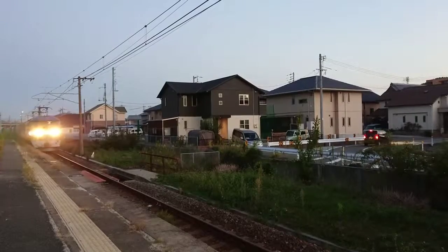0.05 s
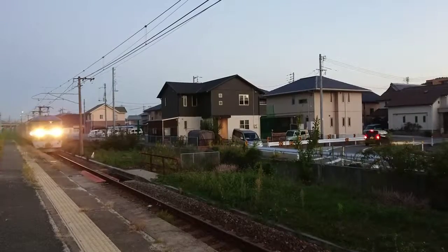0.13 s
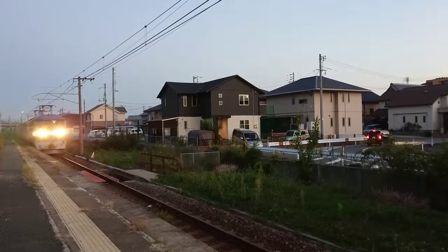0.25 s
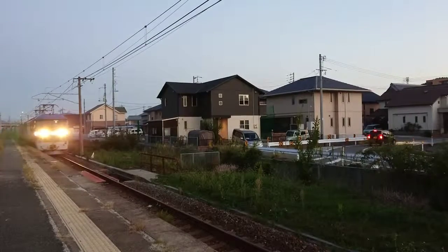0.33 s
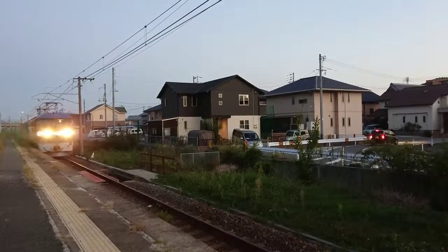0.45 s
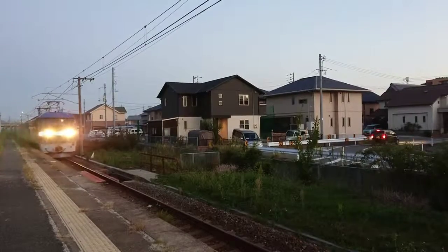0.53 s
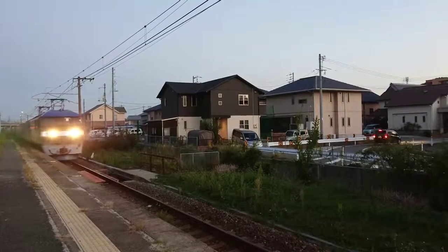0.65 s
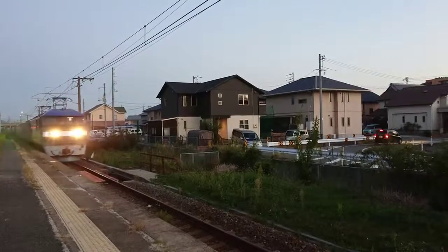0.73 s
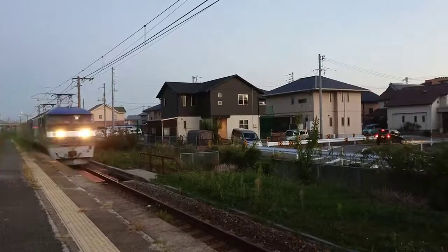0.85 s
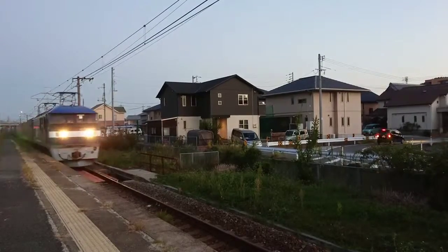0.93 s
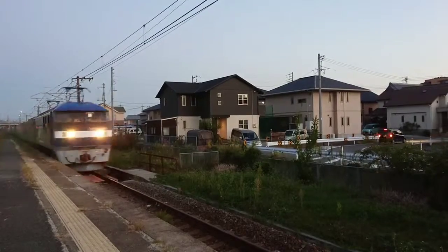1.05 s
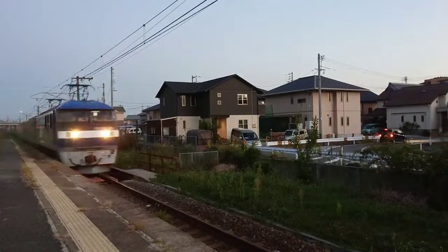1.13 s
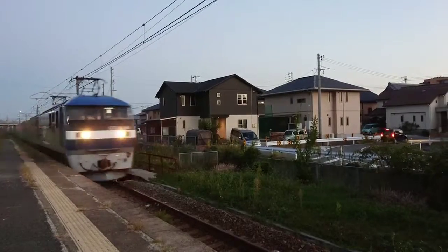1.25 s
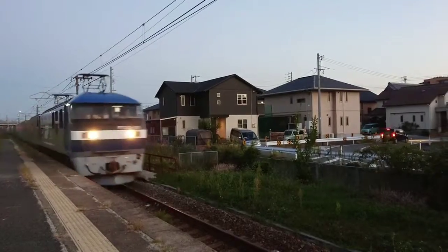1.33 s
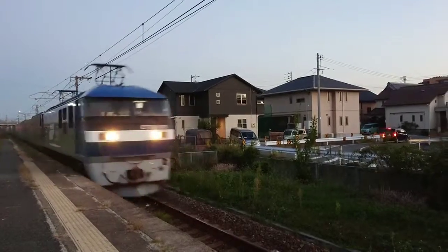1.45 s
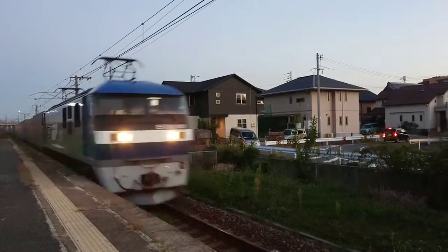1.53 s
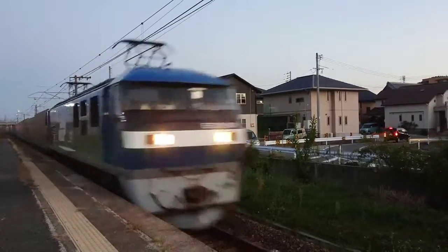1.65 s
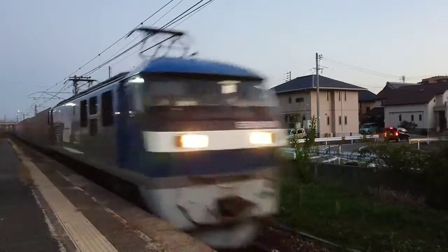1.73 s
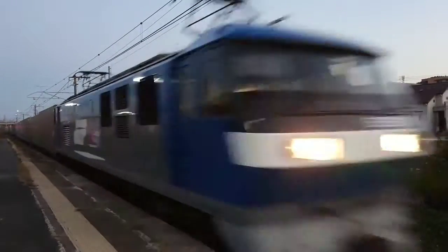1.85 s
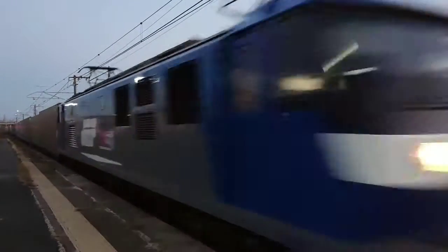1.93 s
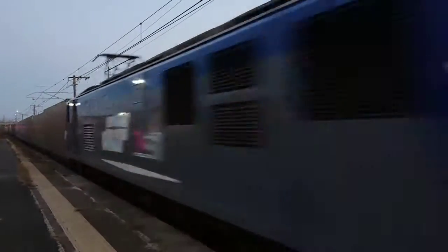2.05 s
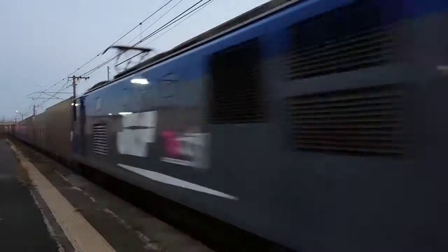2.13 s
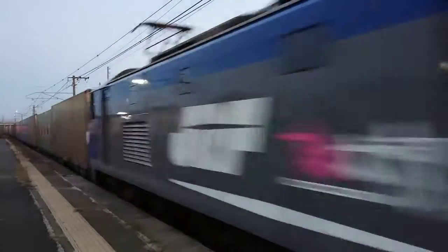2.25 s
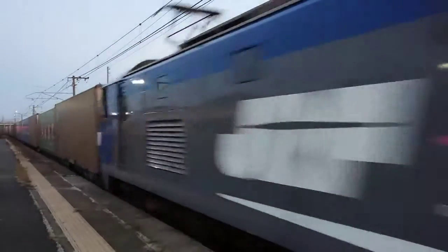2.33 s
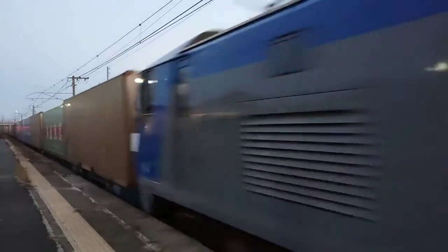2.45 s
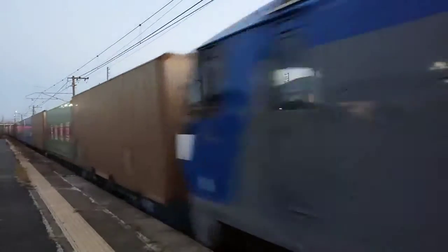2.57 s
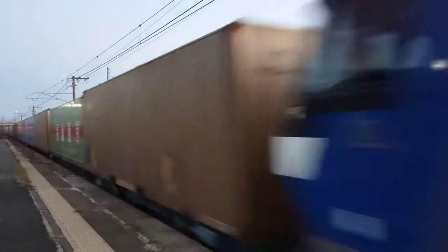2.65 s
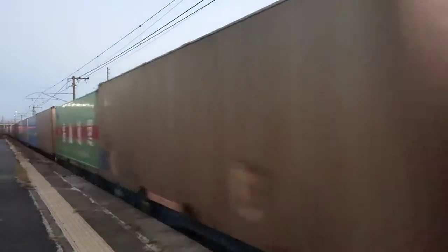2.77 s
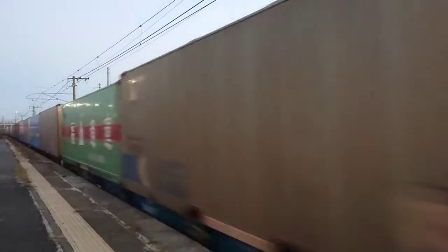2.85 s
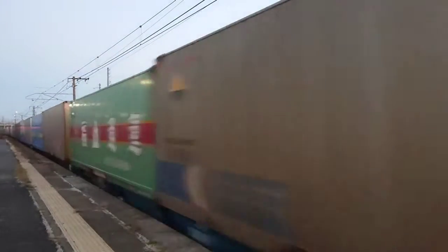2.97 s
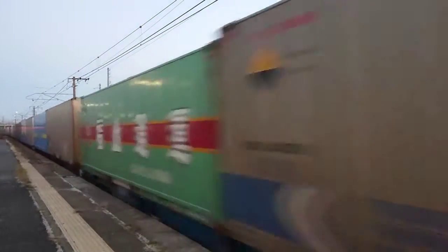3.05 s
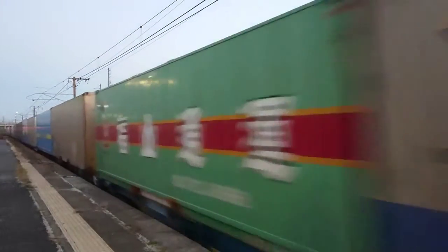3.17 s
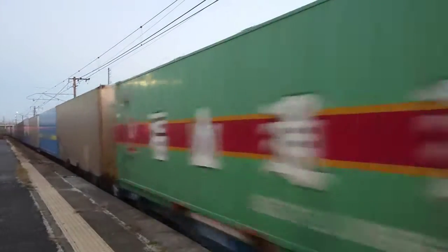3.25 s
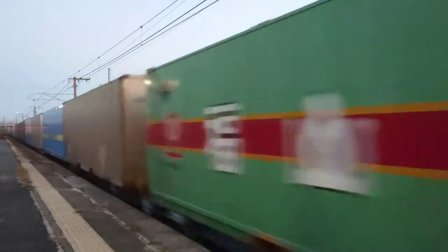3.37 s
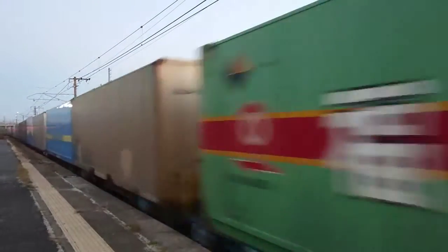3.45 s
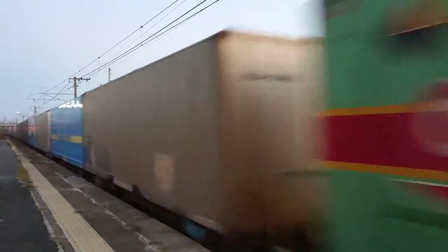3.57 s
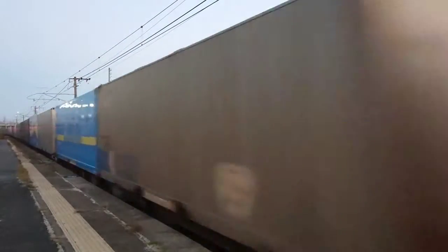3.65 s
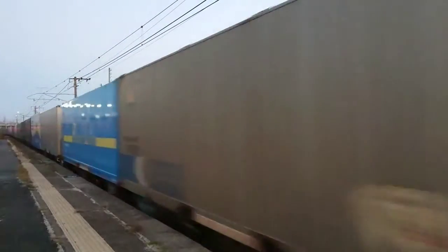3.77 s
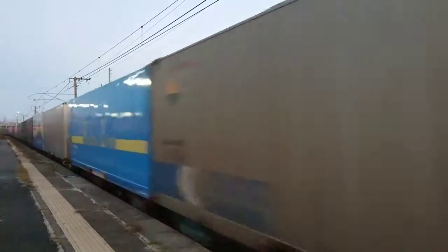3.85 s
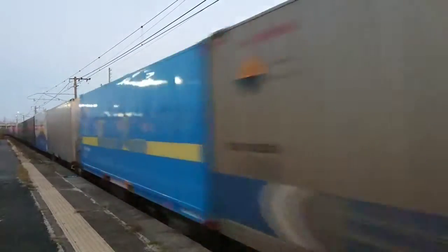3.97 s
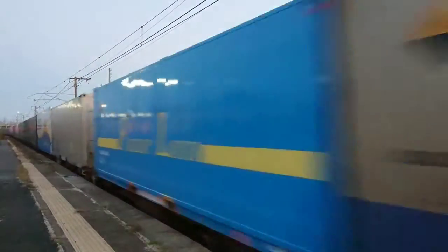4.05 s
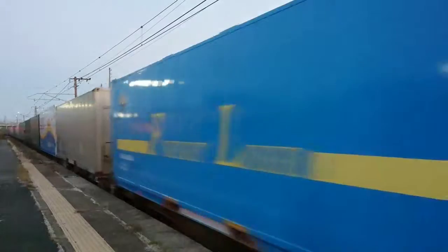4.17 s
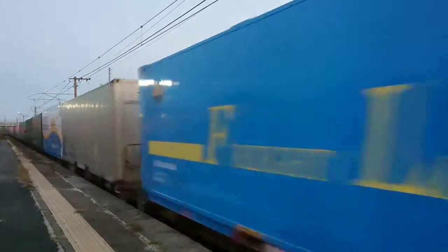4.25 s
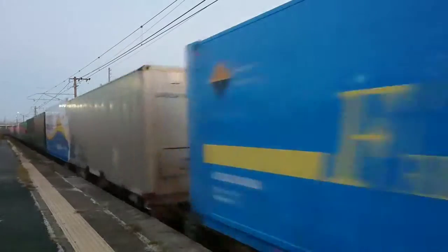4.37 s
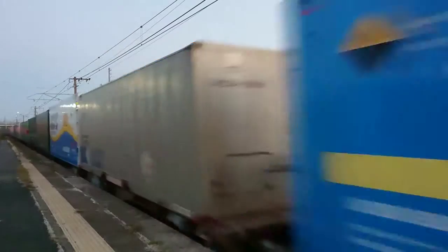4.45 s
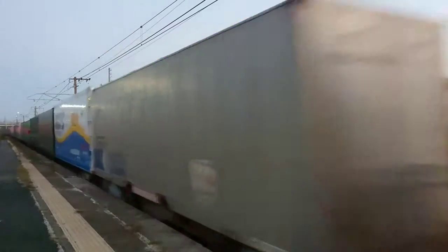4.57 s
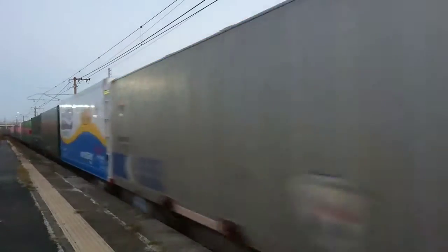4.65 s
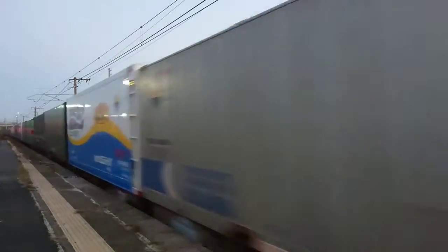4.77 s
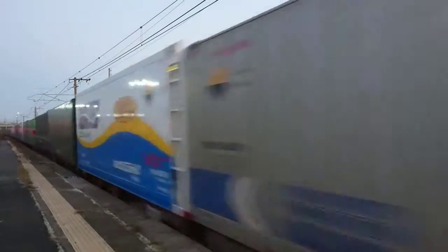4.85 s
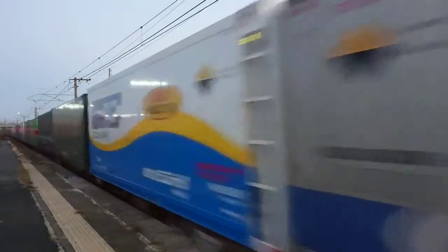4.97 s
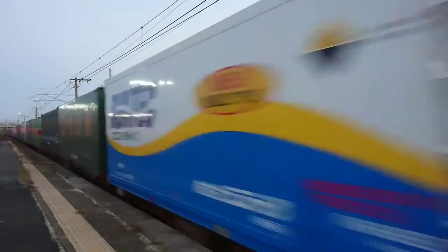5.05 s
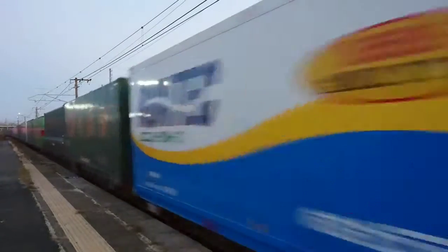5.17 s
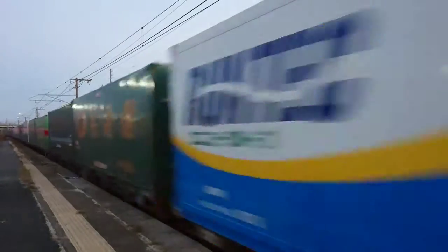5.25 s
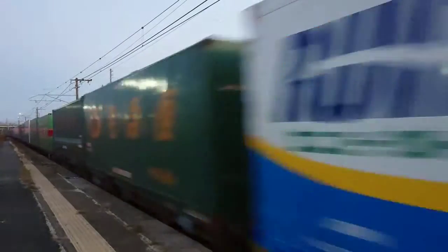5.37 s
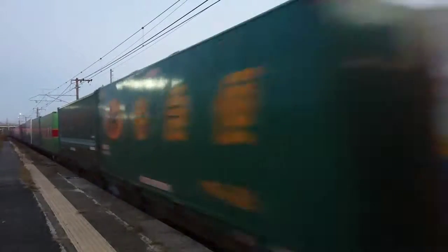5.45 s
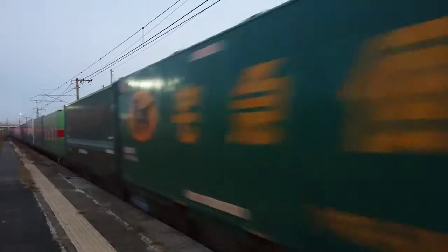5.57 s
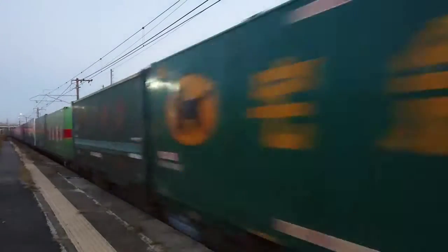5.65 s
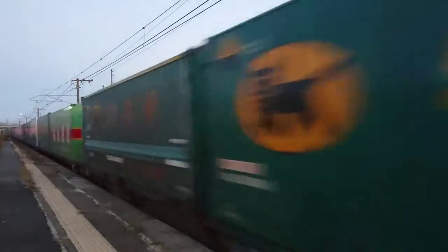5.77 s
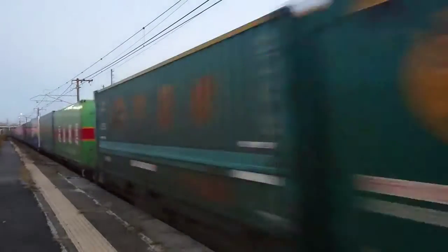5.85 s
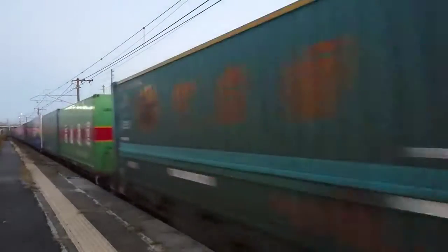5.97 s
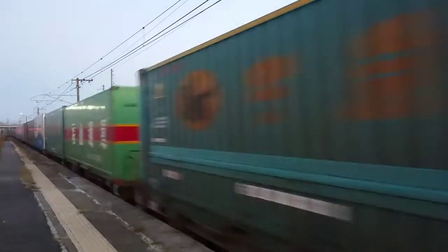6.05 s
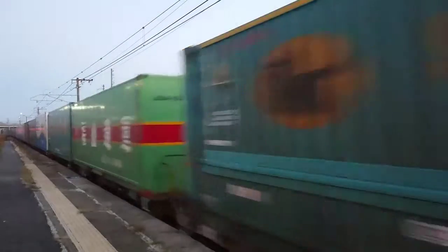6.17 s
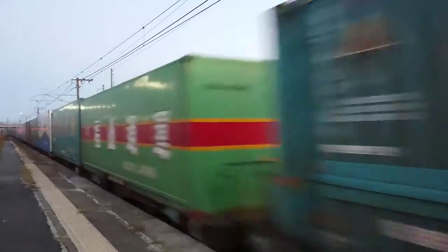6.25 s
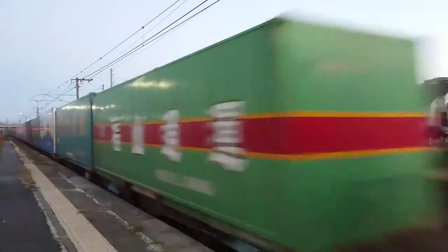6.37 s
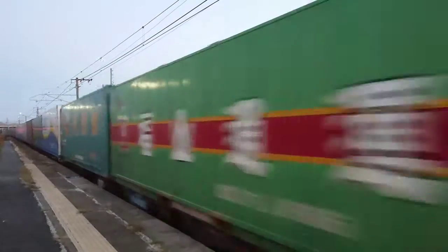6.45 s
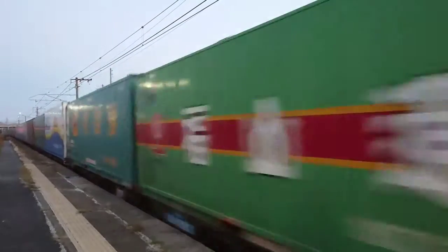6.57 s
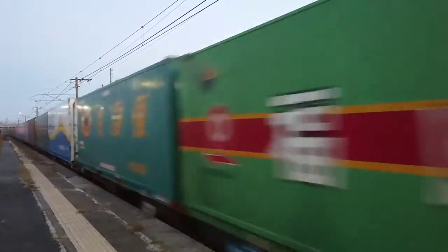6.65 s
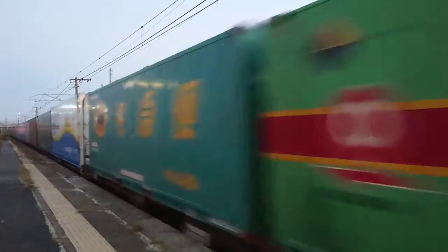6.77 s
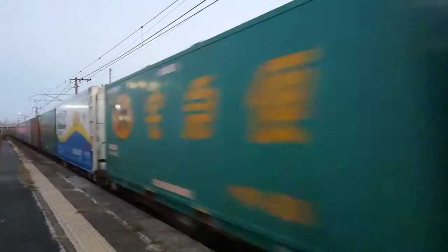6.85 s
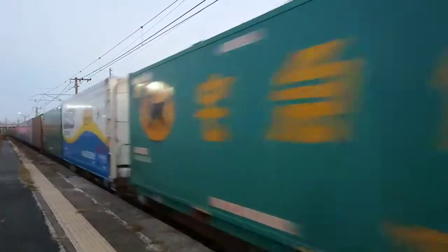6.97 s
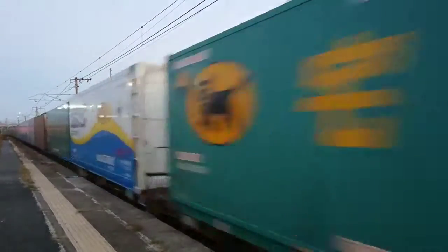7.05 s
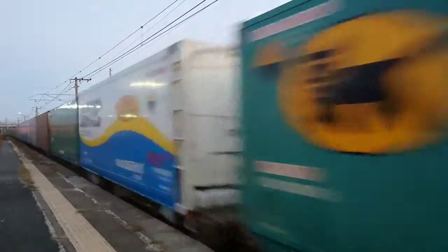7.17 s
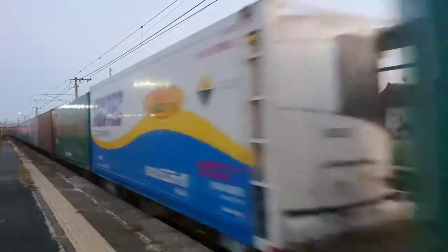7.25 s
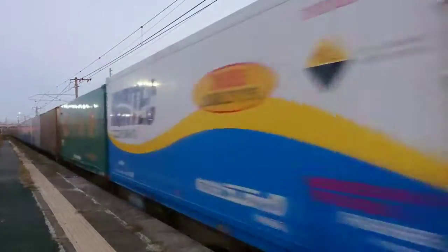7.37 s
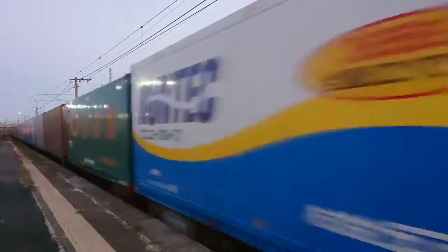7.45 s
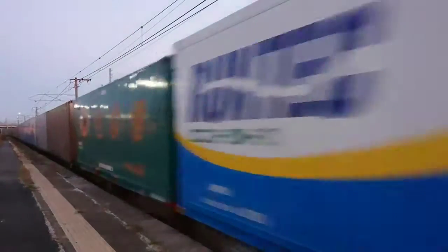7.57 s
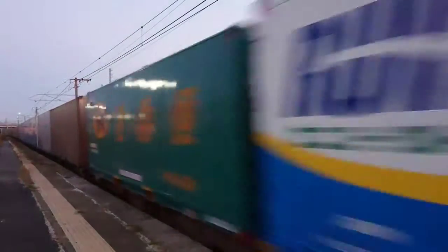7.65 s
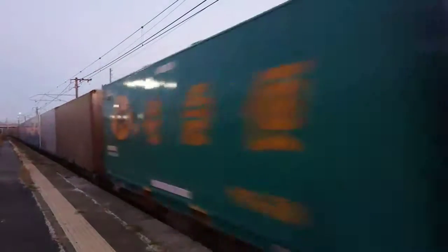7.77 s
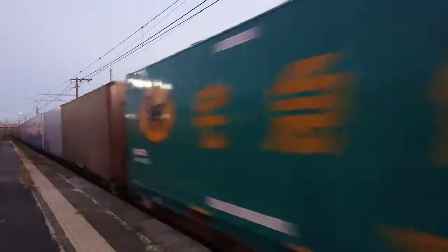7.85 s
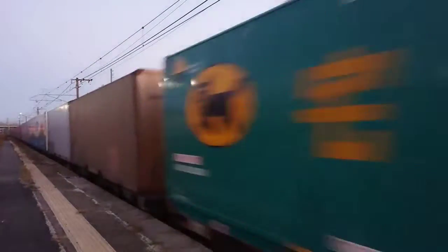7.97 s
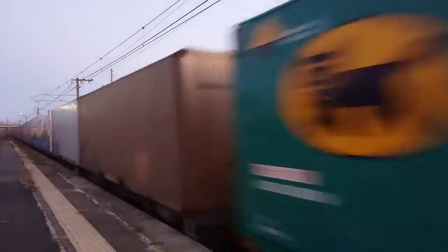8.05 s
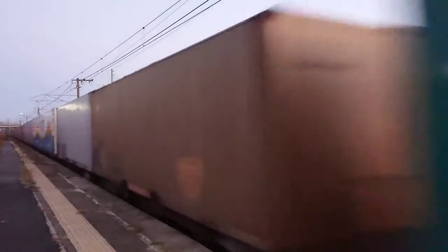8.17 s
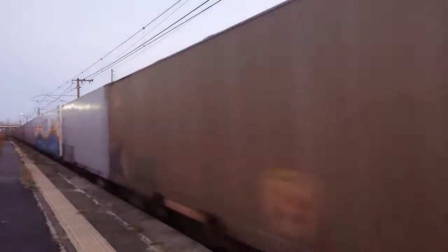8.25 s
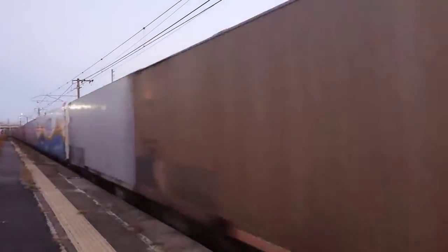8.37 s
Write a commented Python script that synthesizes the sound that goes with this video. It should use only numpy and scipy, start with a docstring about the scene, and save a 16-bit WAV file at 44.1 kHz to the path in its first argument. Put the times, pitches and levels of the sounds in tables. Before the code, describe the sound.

Close beside an outdoor station platform, singing rails and a faint hum announce an electric locomotive. Its blower roar swells quickly, with brief flange squeals and a gear whine dropping in pitch as it passes. Container wagons follow in regular surges of rolling noise and metallic wheel ringing. A flat wheel bangs rapidly past, and wind buffets the stereo microphones. The train is still passing at the end.

```python
"""Freight train passing a platform

An electric locomotive passes close by at about 74 km/h: blower noise, motor lines and Doppler-shifted gear tones.
Container wagons follow: rolling noise swells with each pair of bogies, and single wheels ring in one mode each.
A flat wheel strikes modes of its bogie frame and the sleepers.
Flanges squeal in narrow bands and air hisses in one broad, very high band.
The draught buffets the microphones as bursts of low noise, and one dry tick sounds close to the right one."""
import sys
import numpy as np
from scipy import signal
from scipy.fft import rfft, irfft, next_fast_len
from scipy.io import wavfile
from scipy.ndimage import map_coordinates

SR = 44100
rng = np.random.default_rng(int(sys.argv[2]) if len(sys.argv) > 2 else 0)


def waveform_to_disk(signal):
    """Save audio, clipped to [-1, 1], as 16-bit WAV at the path in sys.argv[1]."""
    frames = np.transpose(np.atleast_2d(signal))
    scaled = np.clip(frames, -1, 1) * 32767
    samples = np.round(scaled).astype(np.int16)
    wavfile.write(sys.argv[1], SR, samples)


N = 370881
T = np.arange(N) / SR
SIZE = next_fast_len(N, real=True)
HZ = np.maximum(np.arange(SIZE // 2 + 1) * SR / SIZE, 1)   # frequencies of the spectrum
SPEED_M_S, SOUND_M_S = 20.5, 343


def from_db(db):
    """Amplitude gain is ten to the power of a twentieth of the level in decibels."""
    return 10 ** (np.asarray(db) / 20)


def rms_one(x):
    """Normalisation: divide by the root of the mean power."""
    return x / np.sqrt(np.mean(x ** 2) + 1e-20)


def in_time(rows):
    """Linear interpolation of each column of a curve at every sample."""
    s, *columns = np.transpose(rows)
    return [np.interp(T, s, c) for c in columns]


def over_hz(points, axis=1):
    """Linear interpolation of one column along a log-frequency axis."""
    points = np.array(points)
    return np.interp(np.log(HZ), np.log(points[:, 0]), points[:, axis])


def drift(rate_hz):
    """Random modulation: white noise through two equal low-pass poles at `rate_hz`; rms about 1."""
    r = np.exp(-80 * np.pi * rate_hz / SR)   # made at a fortieth of the sample rate
    slow = signal.lfilter([1], [1, -2 * r, r * r], rng.standard_normal(N // 40 + 2002))[2000:]
    return np.interp(np.arange(N) / 40, np.arange(len(slow)), rms_one(slow))


# Coherence of the two sides: pitch_hz, likeness (0-1)
LIKENESS = [(60, 0.92), (130, 0.95), (300, 0.94), (640, 0.9), (1400, 0.28), (3000, 0.02), (6000, 0)]


def noise(spectrum):
    """Shaped stereo noise: mid and side mix to coherence in the bass, with steep outer skirts; rms 1."""
    skirts = np.minimum(1, np.minimum(HZ / spectrum[0][0], spectrum[-1][0] / HZ)) ** 6
    mid, side = rfft(rng.standard_normal((2, SIZE))) * from_db(over_hz(spectrum)) * skirts
    alike = np.clip(over_hz(LIKENESS), 0, 1)
    both = np.sqrt(1 + alike) * mid + np.sqrt(1 - alike) * side * [[1], [-1]]
    return rms_one(irfft(both, SIZE)[:, :N])


def tone(hz, waver_hz):
    """Frequency and amplitude modulation by chance broaden a sine into a line; rms 1."""
    phase = 2 * np.pi * np.cumsum(hz + waver_hz * drift(30)) / SR
    return rms_one(np.sin(phase) * from_db(2.2 * drift(18)))


def rough_tone(hz, width_hz):
    """Quadrature modulation by low-passed noise makes a narrow band around a moving pitch; rms 1."""
    phase = 2 * np.pi * np.cumsum(hz) / SR
    return rms_one(drift(width_hz) * np.sin(phase) + drift(width_hz) * np.cos(phase))


def resonances(modes):
    """Resonance: white noise filtered into peaks, each at its own level; rms 1."""
    power = sum(from_db(db) ** 2 / width_hz / (1 + ((HZ - hz) / width_hz) ** 2) ** 2
                for hz, db, width_hz in modes)
    return rms_one(irfft(rfft(rng.standard_normal(SIZE)) * np.sqrt(power), SIZE)[:N])


def ring(clicks, hz, t60):
    """Damped free vibration: a unit click sets a two-pole resonator ringing from height 1."""
    r, w = from_db(-60 / (t60 * SR)), 2 * np.pi * hz / SR
    return signal.lfilter([0, np.sin(w)], [1, -2 * r * np.cos(w), r * r], clicks + 1e-18)


def struck(times, levels_db, modes, contact_hz):
    """Modal excitation: blows softened by a low-pass at `contact_hz` ring modes of alternating sign."""
    blows = np.zeros(N)
    blows[(times * SR).astype(int)] = from_db(levels_db)
    blows = signal.sosfilt(signal.butter(1, contact_hz, fs=SR, output="sos"), blows + 1e-18)
    return sum(from_db(db) * ring(blows, hz, t60) * (-1) ** k for k, (hz, db, t60) in enumerate(modes))


def arch(start_s, length_s):
    """Envelope: the root of a half sine rises quickly, holds and falls quickly."""
    return np.sqrt(np.abs(np.sin(np.pi * np.clip((T - start_s) / length_s, 0, 1))))


def burst(s, rise_s, fall_s, hold_s=0):
    """Envelope: exponential growth to 1 at time s, a hold, then exponential decay."""
    before, after = np.maximum(s - T, 0), np.maximum(T - s - hold_s, 0)
    return np.exp(-np.minimum(before / rise_s + after / fall_s, 20))


def lumps(rows):
    """Envelope: a sum of Gaussian swells, each with its centre, spread and level."""
    return sum(from_db(db) * np.exp(-.5 * np.minimum(((T - s) / spread_s) ** 2, 60)) for s, spread_s, db in rows)


def nearness(t, abreast_s, reach_m, falloff):
    """Distance law: gain 1 when abreast, falling as distance to the power `falloff` beyond the reach."""
    return np.hypot(1, SPEED_M_S * (t - abreast_s) / reach_m) ** -falloff


def doppler(t, abreast_s, distance_m):
    """Doppler effect: the pitch ratio is above 1 on approach and below 1 on departure."""
    past_m = SPEED_M_S * (t - abreast_s)
    return 1 / (1 + SPEED_M_S / SOUND_M_S * past_m / np.hypot(past_m, distance_m))


def passing(sound, abreast_s):
    """Doppler effect by propagation delay: changing travel time bends the pitch, with a slight wobble."""
    travel_s = np.hypot(SPEED_M_S * (T - abreast_s), 2.0) / SOUND_M_S + .0001 * drift(6)   # track 2 m away
    return np.interp(T - travel_s, T, sound)


def sweep(x, abreast_s, turn_s, far_lag_s, near_lag_s):
    """Time-difference localisation: the left side first leads, then lags, as the source moves rightward."""
    lag = np.interp(T, [abreast_s - turn_s, abreast_s + turn_s], [-far_lag_s, near_lag_s])
    return np.array([map_coordinates(x[0], [(T - lag) * SR], order=3, mode="nearest"), x[1]])


# Rail joints ahead: crossed_s, track_loss_db, rail_loss_db (losses until crossed)
JOINTS = [(.55, 1, 4.5), (1.33, 6, 3.2)]
CROSSING_S = 0.072


def past_joints(axis):
    """Transmission loss: track (column 1) or rail (column 2) sound rises as each joint is crossed."""
    return from_db(-sum(joint[axis] * np.clip(.5 - (T - joint[0]) / CROSSING_S, 0, 1) for joint in JOINTS))


# Rail noise spectrum: pitch_hz, density_db (per Hz, relative)
RAILS = [(1400, -30), (1900, -25), (2230, 5), (2450, -1.5), (2800, -1), (3300, -14), (4400, 1.5),
         (5200, -1), (6500, -17.5), (12000, -23), (15500, -30)]
ARRIVAL_S = 2.4
RAIL_DB, RAIL_RISE_DB_PER_M = -36, 0.03   # level on arrival, before flutter; slight rise with distance ahead


def rails():
    """Structure-borne sound: rails sing nearly steadily ahead, step up at joints, fade once covered."""
    ahead_m = SPEED_M_S * np.maximum(ARRIVAL_S - T, 0)
    uncovered = nearness(np.maximum(T, ARRIVAL_S), ARRIVAL_S, reach_m=25, falloff=1.6)
    level = from_db(RAIL_DB + RAIL_RISE_DB_PER_M * ahead_m + 0.2 * drift(13))
    return level * past_joints(axis=2) * uncovered * noise(RAILS)


# Wagon ends, a bogie either side of the coupling: abreast_s, track_level_db, wheel_level_db
# (levels per bogie, before the random wavering and the wheel gain)
WAGON_ENDS = [(2.9, -24, -29.5), (3.928, -24, -31.5), (4.85, -24, -31.5), (5.738, -23.5, -29.5),
              (6.658, -24.5, -30), (7.518, -23.5, -30), (8.39, -25, -30.5)]
BOGIE_GAP_M = 4.46   # between the two bogies at a coupling


def wagons(levels_db, reach_m, falloff):
    """Incoherent summation: the powers of all passing bogies add, two at each coupling."""
    half_s = .5 * BOGIE_GAP_M / SPEED_M_S
    return np.sqrt(sum((from_db(db) * nearness(T, end[0] + offset, reach_m, falloff)) ** 2
                       for end, db in zip(WAGON_ENDS, levels_db) for offset in (-half_s, half_s)))


# Radiation spectra of bodies, track and wheel discs: pitch_hz, density_db (per Hz, relative)
RUMBLE = [(13, -44), (22, -39), (43, -9.5), (64, -1), (119, -2.5), (194, -9), (220, -7.5), (290, -36),
          (480, -120)]
TRACK = [(100, -12), (170, -2), (195, -4.5), (276, 4.5), (323, -1.5), (422, -1.5), (658, -10), (920, -8.5),
         (1250, -13.5), (1480, -21), (1800, -26), (2340, -57), (3960, -120)]
WHEELS = [(1200, -33), (1800, -6), (2200, -2), (2600, 1.5), (3100, -4.5), (3500, -2), (3850, -4.5),
          (4400, 4), (4850, 3), (5300, 3), (6100, -5.5), (7200, -15), (12500, -21.5), (15500, -37)]
# Booms of the rocking wagon bodies: centre_s, spread_s, level_db
BOOMS = [(3.05, 0.081, -25), (3.45, 0.17, -23.5), (4.75, 0.073, -27), (5.3, 0.15, -21.5),
         (7.55, 0.097, -24)]
LOCO_S = 2.474   # the locomotive's middle is abreast
# closest-point levels, before the random wavering and the wheel gain
LOCO_RUMBLE_DB, LOCO_TRACK_DB, LOCO_WHEELS_DB, WAGON_RUMBLE_DB = -16.5, -18.5, -20.5, -31


def rolling():
    """Roughness excitation: treads and rails shake bodies, track and wheel discs, swelling with the bogies."""
    _, track_db, wheel_db = np.transpose(WAGON_ENDS)
    waver = drift(2.4)   # slow random wavering of the rolling level
    rumble = np.hypot(from_db(LOCO_RUMBLE_DB) * nearness(T, LOCO_S - .05, reach_m=6.7, falloff=1.53),
                      wagons([WAGON_RUMBLE_DB] * len(WAGON_ENDS), reach_m=15.8, falloff=1.32))
    track = np.hypot(from_db(LOCO_TRACK_DB) * nearness(T, LOCO_S, reach_m=2.7, falloff=0.88),
                     wagons(track_db, reach_m=3.42, falloff=0.88))
    wheels = np.hypot(from_db(LOCO_WHEELS_DB) * nearness(T, LOCO_S, reach_m=5.96, falloff=2.38),
                      wagons(wheel_db, reach_m=3.0, falloff=0.93))
    rumble = np.hypot(rumble, lumps(BOOMS))
    track = track * past_joints(axis=1) * from_db(1.43 * waver)
    wheels = wheels * past_joints(axis=2) * from_db(3.5 + 0.5 * waver + 1.0 * drift(12.6))
    return rumble * noise(RUMBLE) + track * noise(TRACK) + wheels * noise(WHEELS)


# Motor hums and blower whistles: pitch_hz, arrival_level_db, growth_db_per_s, waver_hz
MOTOR_LINES = [(364, -42, 3, 1.05), (1145, -48.5, 6.5, 13), (1334, -40, 6.5, 2.5)]
MOTOR_FADE_DB_PER_S = 47
# Deep hum of the far locomotive: start_s, length_s, level_db
HUMS = [(-.2, 0.97, -36.5), (1.603, 0.34, -30)]
HUM_HZ = 65.9


def motors():
    """Directivity: tones beamed forward grow until arrival, then fade; a deep hum comes and goes."""
    before_s, after_s = np.maximum(ARRIVAL_S - T, 0), np.maximum(T - ARRIVAL_S, 0)
    whistles = sum(from_db(db - growth * before_s - MOTOR_FADE_DB_PER_S * after_s) * tone(hz, waver_hz)
                   for hz, db, growth, waver_hz in MOTOR_LINES)
    hum = sum(from_db(db) * arch(s, length_s) for s, length_s, db in HUMS) * tone(HUM_HZ, waver_hz=1.7)
    return whistles + hum


# Blower noise spectrum: pitch_hz, density_db (per Hz, relative)
BLOWERS = [(150, -2.5), (330, 15), (480, -42), (620, 6), (800, 6), (980, 0), (1400, 0.5), (1800, -2),
           (2200, 5.5), (2650, -12), (3400, -7), (6500, -23.5), (11000, -17.5), (15500, -45)]
BLOWERS_S = 2.43   # the air outlets are abreast


def blowers():
    """Turbulent flow noise: cooling air roars with a fluctuating level that follows the distance law."""
    level = from_db(-16.5 + 1.06 * drift(29)) * nearness(T, BLOWERS_S, reach_m=3.46, falloff=1.147)
    return level * noise(BLOWERS)


# Overtones of the gear whine at rest: pitch_hz, level_db (relative), width_hz
GEAR = [(1068, 2, 24), (1612, -10, 9), (2140, -2, 20), (2690, -13, 25)]
# Gearboxes beaming their whine forward: abreast_s, lead_s (of the loudest moment), level_db
GEARBOXES = [(2.48, .08, -26), (3.0, .24, -26)]
# Meshing tones: abreast_s, multiple (of the tooth rate), loudest_s, reach_m, waver_hz, level_db
TOOTH_TONES = [(2.6, 4, 2.23, 1.6, 13, -30), (2.54, 2, 2.38, 1.6, 20, -26), (2.98, 4, 2.49, 2.0, 11, -28),
               (2.98, 4, 2.7, 2.2, 11, -24), (3.02, 2, 2.74, 4.0, 14, -27.5), (2.98, 1, 2.76, 1.7, 3, -25)]
TOOTH_HZ, GEAR_DISTANCE_M = 540, 2.4
# Drone near the tooth rate: time_s, level_db (relative to DRONE_DB)
DRONE_LEVEL = [(2.55, -60), (2.68, -12), (2.85, -9), (2.9, -1), (2.97, -4), (3.19, -1), (3.24, -15),
               (3.8, -21), (4.2, -70)]
DRONE_HZ, DRONE_DB, DRONE_WAVER_HZ, DRONE_ABREAST_S, DRONE_DISTANCE_M = 548, -23, 10, 2.8, 2.2


def gears():
    """Tooth meshing: whine, harmonics and a drone at the locomotive's tail, lowered by Doppler in passing."""
    whine = sum(from_db(db) * nearness(T, s - lead_s, reach_m=3.4, falloff=1.8) * passing(resonances(GEAR), s)
                for s, lead_s, db in GEARBOXES)
    teeth = 0
    for s, multiple, loudest_s, reach_m, waver_hz, db in TOOTH_TONES:
        hz = multiple * TOOTH_HZ * doppler(T, s, GEAR_DISTANCE_M)
        teeth = teeth + from_db(db) * nearness(T, loudest_s, reach_m, np.sqrt(2)) * tone(hz, waver_hz)
    drone_db, = in_time(DRONE_LEVEL)
    drone = tone(DRONE_HZ * doppler(T, DRONE_ABREAST_S, DRONE_DISTANCE_M), DRONE_WAVER_HZ)
    return whine + teeth + from_db(DRONE_DB + drone_db) * drone


# Hiss spectrum: pitch_hz, density_db (per Hz, relative)
HISS_COLOUR = [(7000, -30), (10000, 0), (13000, 6), (15500, -7)]
# Puffs of air from the wagons: start_s, level_db (before flutter), decay_s
PUFFS = [(2.85, -50, 0.27), (5.39, -40.5, 0.24), (5.72, -50, 0.1), (6.46, -50, 0.2), (8.28, -51, 0.2)]
PUFF_RISE_S, PUFF_HOLD_S = 0.049, 0.074
LOCO_HISS_DB = -44   # when abreast, before flutter


def hiss():
    """Jet noise: a thin, high hiss passes with the locomotive and comes in puffs from the wagons."""
    level = from_db(LOCO_HISS_DB) * nearness(T, LOCO_S, reach_m=2.3, falloff=1.05)
    level = level + sum(from_db(db) * burst(s, PUFF_RISE_S, decay_s, PUFF_HOLD_S) for s, db, decay_s in PUFFS)
    return level * from_db(2.7 * drift(8.1)) * noise(HISS_COLOUR)


# Flange squeals: start_s, length_s, pitch_hz (at the start), glide_hz, level_db
SQUEALS = [(1.52, 0.115, 780, 115, -27.5), (1.68, 0.6, 855, -32, -34), (2.22, 0.15, 828, -10, -26)]
SQUEAL_WIDTH_HZ = 13   # at 1 kHz; grows with the root of the pitch


def squeals():
    """Friction excitation: flanges rub the rail in short, rough glides."""
    out = np.zeros(N)
    for s, length_s, hz, glide_hz, db in SQUEALS:
        width_hz = SQUEAL_WIDTH_HZ * np.sqrt(hz / 1000)
        pitch_hz = hz + glide_hz * np.clip((T - s) / length_s, 0, 1)
        out += from_db(db) * arch(s, length_s) ** 2 * rough_tone(pitch_hz, width_hz)
    return out


# Buffets of the draught: centre_s, spread_s, level_db (before the left/right gains)
GUSTS = [(1.887, 0.013, -18), (2.32, 0.015, -12), (2.436, 0.047, -13), (4.25, 0.038, -16),
         (7.86, 0.019, -17), (8.37, 0.11, -17)]
# Buffet spectrum: pitch_hz, density_db (per Hz, relative)
GUST_COLOUR = [(25, -13), (48, 9.5), (110, 4), (250, -13), (600, -56)]


def draught():
    """Pressure fluctuation: lumps of moving air hit mostly the left microphone."""
    return lumps(GUSTS) * noise(GUST_COLOUR) * from_db([[-2], [-13]])


# Single wheels ringing as they go by: abreast_s, pitch_hz (at rest), level_db (before the left/right gains)
RINGING_WHEELS = [(3.66, 4580, -35.5), (3.87, 4320, -37), (4.02, 4480, -35), (4.13, 4130, -33),
                  (4.54, 4650, -34.5), (4.69, 4160, -37), (4.83, 2660, -38), (4.98, 3450, -35.5),
                  (4.98, 5500, -36.5), (5.01, 4520, -37.5), (5.98, 4280, -36), (6.38, 4440, -36),
                  (6.83, 5130, -31.5), (6.85, 2620, -37), (7.36, 2750, -36.5), (7.4, 5280, -32),
                  (7.42, 4440, -31), (7.48, 3530, -39), (8.32, 4420, -35)]
RING_WIDTH_HZ, RING_REACH_M, RING_DISTANCE_M, RING_BREAKUP_DB = 90, 1.5, 5.5, 2


def wheel_song():
    """Modal radiation: wheels ring roughly in one mode each, swelling and sinking in pitch by Doppler."""
    out = np.zeros(N)
    flutter = drift(RING_WIDTH_HZ) + 1j * drift(RING_WIDTH_HZ)
    flutter = flutter * rms_one(from_db(RING_BREAKUP_DB * drift(35)))
    for s, hz, db in RINGING_WHEELS:
        near = np.abs(T - s) < .5
        t, own_flutter = T[near], np.roll(flutter, rng.integers(N))[near]
        phase = 2 * np.pi * np.cumsum(hz * doppler(t, s, RING_DISTANCE_M)) / SR
        rough_ring = np.real(own_flutter * np.exp(1j * phase))
        out[near] += from_db(db) * nearness(t, s, RING_REACH_M, 2.35) * rough_ring
    return out * from_db([[-2], [2]])


# Blows of the flat wheel, one a turn: blow_s, frame_level_db, sleeper_level_db, shudder_level_db
FLATS = [(5.52, -30, -30, -27), (5.633, -15, -17, -18.5), (5.741, -.5, -12, -19), (5.853, -13, -12, -14.5),
         (5.961, -16, -3.5, -21.5), (6.073, -5, -28, -20.5), (6.192, -12, -15, -24),
         (6.311, -13, -22, -24.5), (6.432, -14, -30, -27)]
# Modes of the bogie frame, then of a sleeper in its ballast: pitch_hz, level_db (relative), t60_s
FRAME = [(384, -2, 0.064), (538, -3, 0.031), (644, -8, 0.028), (870, -14, 0.021), (1780, -16, 0.1)]
SLEEPER = [(231, 1, 0.071), (294, 2, 0.027)]
CONTACT_HZ, SLEEPER_CONTACT_HZ = 1500, 500   # softness of the blow; the ballast softens it further
# Spectra of the shuddering bogie frame and the struck wheel: pitch_hz, density_db (per Hz, relative)
SHUDDER = [(120, -15), (250, 4.5), (400, 2.5), (620, -3), (1000, -8.5), (1500, -29)]
CLANG = [(1000, 6.5), (1600, -1), (1880, 8.5), (2150, 1), (2500, 5.5), (3000, -6), (5000, 0), (8000, -24.5),
         (12500, -21), (15500, -37)]
CLANG_DB, CLANG_ABREAST_S, FLAT_REACH_M = -21, 5.79, 3.4   # clang level before the grain
# the flat spot scrapes into the rail just before each blow and chatters on after it
SCRAPE_LEAD_S, CHATTER_S, CHATTER_GRAIN_DB = .004, .023, 2.5


def flat_wheel():
    """Impact: each turn a flat spot knocks frame and sleeper modes; chatter shakes bogie and wheel."""
    times, frame_db, sleeper_db, shudder_db = np.transpose(FLATS)
    thud = struck(times, frame_db, FRAME, CONTACT_HZ) + struck(times, sleeper_db, SLEEPER, SLEEPER_CONTACT_HZ)
    shudder = sum(from_db(db) * burst(s, rise_s=0.003, fall_s=0.02, hold_s=CHATTER_S)
                  for s, db in zip(times, shudder_db))
    clang = 0
    for s in times:   # loudest when abreast
        scrape = burst(s - SCRAPE_LEAD_S, rise_s=0.0091, fall_s=0.015, hold_s=SCRAPE_LEAD_S + CHATTER_S)
        clang = clang + nearness(s, CLANG_ABREAST_S, FLAT_REACH_M, 0.97) * scrape
    grain = rms_one(from_db(CHATTER_GRAIN_DB * drift(170)))
    return thud + grain * (shudder * noise(SHUDDER) + from_db(CLANG_DB) * clang * noise(CLANG))


# Modes of the tick: pitch_hz, level_db (relative), t60_s
TICK_MODES = [(700, -3, .004), (1250, -2, .0022), (2300, -3, .0018), (3400, -10, .0012)]
TICK_S, TICK_DB = 7.131, -10   # click level before the modes and the left/right gains


def tick():
    """Impulse response: one click rings short modes, close to the right microphone."""
    click = np.zeros(N)
    click[round(TICK_S * SR)] = -from_db(TICK_DB)
    return sum(from_db(db) * ring(click, hz, t60) for hz, db, t60 in TICK_MODES) * from_db([[-14], [6]])


def scene():
    """Superposition: the train and its flat wheel sweep past; the draught and tick stay at the microphones."""
    locomotive = blowers() + motors() + gears()
    train = locomotive + rails() + rolling() + wheel_song() + squeals() + hiss()
    moving_train = sweep(train, abreast_s=2.26, turn_s=0.25, far_lag_s=0.00017, near_lag_s=0.00028)
    moving_flat = sweep(flat_wheel(), abreast_s=6.6, turn_s=0.34, far_lag_s=0.0002, near_lag_s=0.00017)
    return moving_train + moving_flat + draught() + tick()


# Tone balance of left and right: pitch_hz, left_db, right_db
TONE_BALANCE = [(20, -16, -18), (44, 5.5, -3), (60.5, 2, -0.3), (127, -0.8, -3.5), (294, -4.5, -4.5),
                (1005, 0, 1), (3750, -0.5, 2), (3740, -3, 5.5), (4780, -13, 0.5), (7180, -4.5, 1.5),
                (7090, -14, -4.5), (9200, -53, -48), (9734, 0.5, -35), (15800, 10.5, -29)]
FULL_SCALE, CUTOFF_HZ = 0.99, 15600


def record(dry):
    """Linear filtering gives each side its own tone balance; saturation rounds peaks, a low-pass cuts the top."""
    balance = from_db([over_hz(TONE_BALANCE, axis=1), over_hz(TONE_BALANCE, axis=2)])
    heard = irfft(rfft(dry, SIZE) * balance, SIZE)[:, :N]
    rounded = heard / (1 + (heard / FULL_SCALE) ** 8) ** (1 / 8)
    return signal.sosfilt(signal.ellip(10, .2, 80, CUTOFF_HZ, fs=SR, output="sos"), rounded)


dry = scene()
out = record(dry)
waveform_to_disk(out)
```